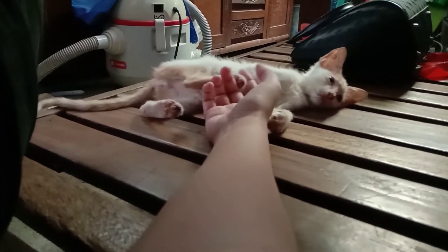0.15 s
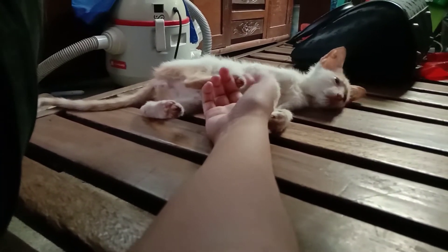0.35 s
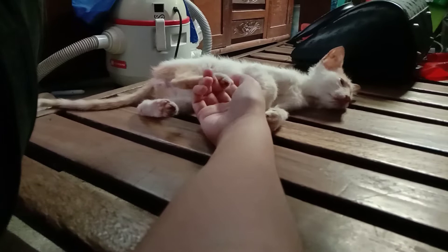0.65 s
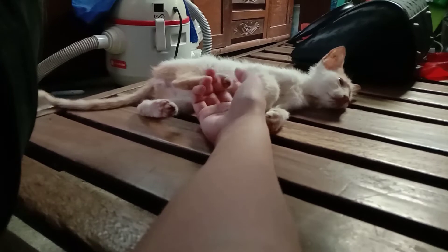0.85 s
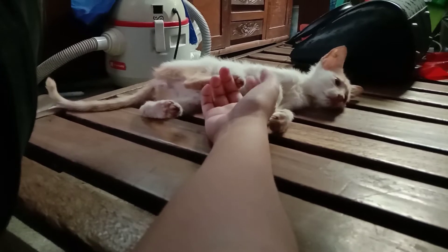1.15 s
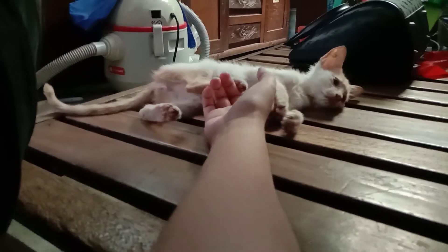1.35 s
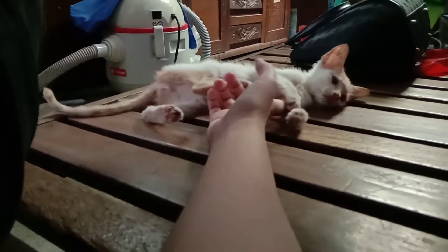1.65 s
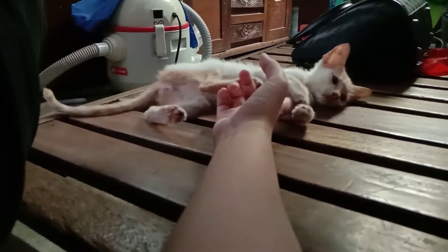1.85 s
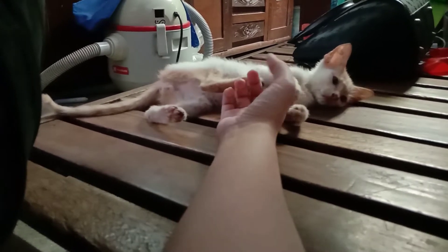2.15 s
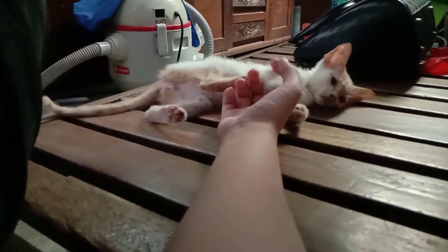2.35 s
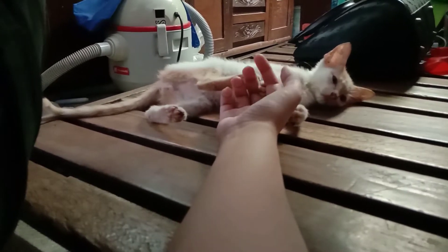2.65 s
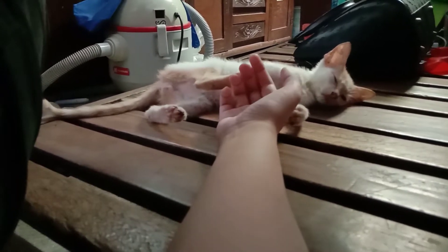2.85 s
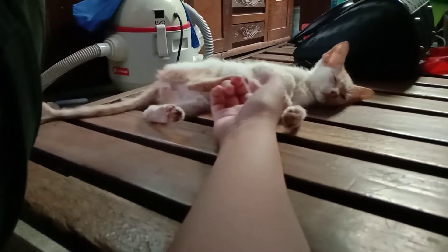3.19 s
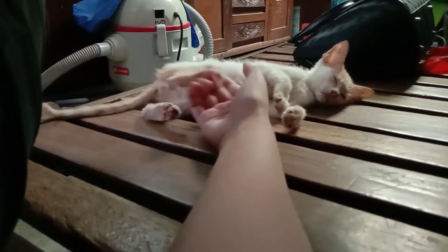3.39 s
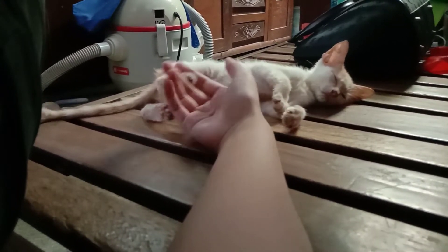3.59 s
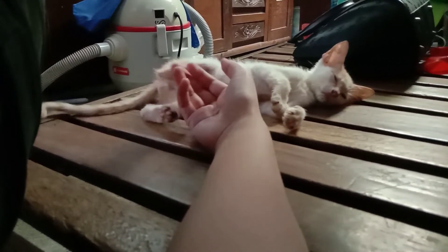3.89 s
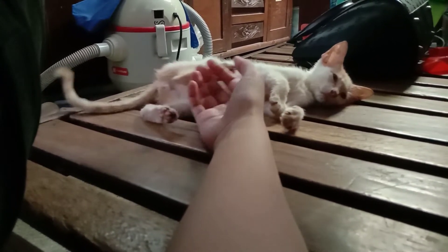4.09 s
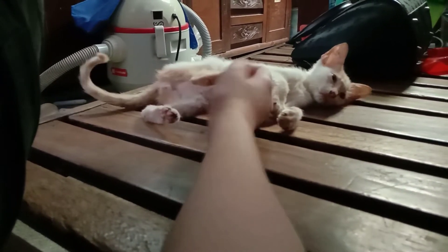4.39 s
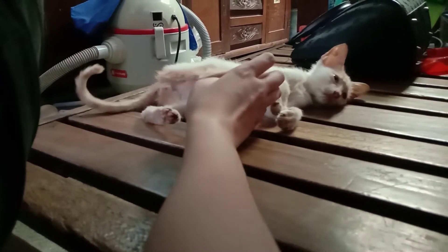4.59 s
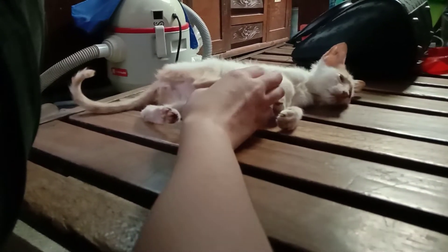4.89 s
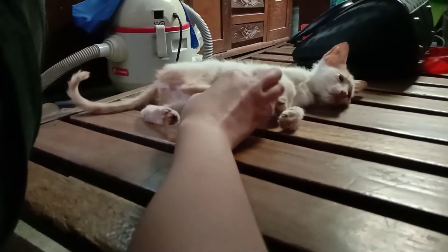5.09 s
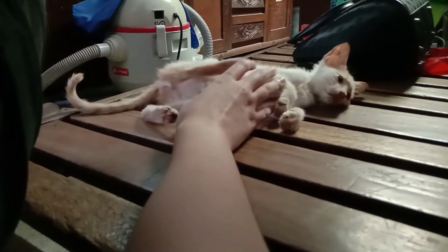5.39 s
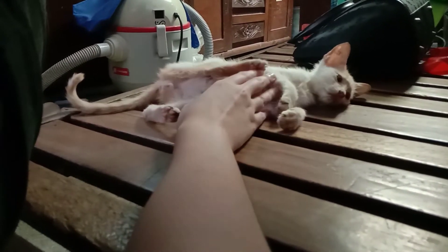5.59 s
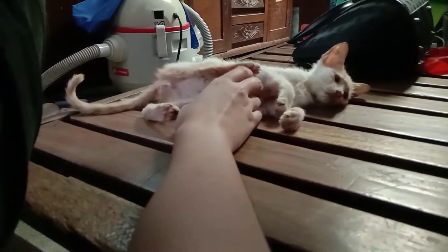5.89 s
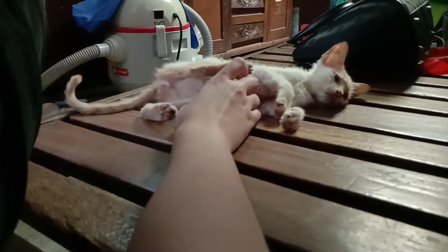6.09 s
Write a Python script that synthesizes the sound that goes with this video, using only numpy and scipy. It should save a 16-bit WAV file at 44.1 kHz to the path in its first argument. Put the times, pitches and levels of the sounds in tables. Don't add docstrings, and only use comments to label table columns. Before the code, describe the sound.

Indoors beside an open wall, a low motor hum throbs under soft whirring air and far traffic. Just before two seconds a rooster in the yard pushes out three raspy syllables, then a clearer held note that roughens and drops away. Faint fowl answer from far off. Near the end another crow starts unsteadily and breaks into a squawk, cut off. A phone microphone catches it with light hiss, nearly mono.

```python
import sys
import numpy as np
from scipy import signal
from scipy.fft import rfft, irfft, next_fast_len
from scipy.io import wavfile
from scipy.ndimage import uniform_filter1d, map_coordinates

SR = 44100
rng = np.random.default_rng(int(sys.argv[2]) if len(sys.argv) > 2 else 0)


def inscribe(sig):
    pcm = np.round(np.clip(np.atleast_2d(sig).T, -1, 1) * 32767)
    wavfile.write(sys.argv[1], SR, pcm.astype(np.int16))


def how_loud(loudness_db):
    steps = np.asarray(loudness_db, float) / 20
    return 10 ** steps


N = 275184


def rooster():
    return syllables() + held_note() + rise() + squawk()


# (time [s], effort [dB], hoarseness [0-1], beak opening as second over first partial [dB])
SYLLABLES = [(1.78, -33, 0.56, -3.5), (1.816, -33.5, 0.76, -2.5), (1.846, -31, 0.71, 7.5),
             (1.96, -33, 0.92, 1.5), (2.055, -44, 1.03, 3.5), (2.1, -33, 0.73, 6.5),
             (2.18, -32.5, 0.79, -6.5), (2.26, -42.5, 1.02, -6), (2.312, -32, .8, -1.5),
             (2.36, -35.5, 0.73, 14), (2.42, -34, 0.53, -0.5), (2.534, -34, 0.59, -4),
             (2.62, -33, 0.65, -2.5), (2.665, -33, 0.84, -7), (2.702, -36.5, 0.93, -4),
             (2.86, -45, 0.56, -7)]
# (time [s], pitch [Hz])
SYLLABLE_PITCH = [(1.78, 640), (1.805, 700), (1.83, 875), (1.9, 905), (2.0, 900), (2.1, 953), (2.3, 947),
                  (2.68, 903), (2.85, 870)]
# (multiple of pitch, level over the upper level [dB], start [s], end [s])
SYLLABLE_TOP = [(3, 0, 2.08, 2.22), (3, 4, 2.38, 2.7), (4, -0.5, 1.8, 2.75), (5, -12, 1.91, 2.0),
                (5, -9, 2.08, 2.25), (5, -7, 2.29, 2.68), (6, -15.5, 2.1, 2.25), (6, -14, 2.3, 2.66),
                (7.15, -14, 1.87, 1.98), (8, -19, 1.835, 1.98), (8, -20, 2.48, 2.72), (9, -17.5, 2.31, 2.6),
                (1.8, 12.5, 2.26, 2.4)]
# (frequency [Hz], density [dB per Hz])
RASP = [(380, -45.5), (640, -7), (879, 1), (1030, -12), (1210, 1.5), (1380, -8.5), (1690, 0.5), (2050, -17),
        (2560, -23), (3550, -22.5), (4380, -45.5), (4670, -48.5), (6010, -61.5), (7430, -48.5),
        (8000, -73.5), (10400, -93.5), (17600, -120)]


def syllables():
    return crow(SYLLABLES, SYLLABLE_PITCH, SYLLABLE_TOP, RASP, top_db=-60)


# (time [s], effort [dB], hoarseness [0-1], second over first partial [dB])
HELD = [
    (2.86, -43.5, 0.93, -4),
    (2.93, -30, 0.52, -8),
    (3.022, -32, .08, -3.5),
    (3.14, -30, .03, -16),
    (3.17, -30, .03, 7.5),
    (3.226, -40.5, 0.46, 19),
    (3.285, -33, 0.37, 12.5),
    (3.33, -35.5, 0.73, -9),
    (3.55, -67, 0.5, 13),
]
# (time [s], pitch [Hz])
HELD_PITCH = [(2.88, 845), (2.95, 850), (3.11, 843), (3.28, 829), (3.33, 815), (3.55, 808)]
# (multiple of pitch, level over the upper level [dB], start [s], end [s])
HELD_TOP = [(1.5, 13, 2.9, 3.42), (2.5, -4.5, 2.92, 3.33), (3, 1.5, 2.89, 3.45), (4, 4, 2.88, 3.48),
            (4.5, -24, 2.92, 3.17), (5, -25, 2.9, 3.25), (7, -24, 3.12, 3.34), (8, -24, 3.04, 3.2),
            (8, -14.5, 3.2, 3.4), (8.5, -25, 3.1, 3.3), (9, -28, 3.05, 3.38)]


def held_note():
    return crow(HELD, HELD_PITCH, HELD_TOP, RASP, top_db=-61.0)


# (time [s], effort [dB], hoarseness [0-1], second over first partial [dB])
RISE = [
    (5.74, -56, .87, -32),
    (5.77, -49, 0.65, 5),
    (5.81, -39.5, 0.74, -1),
    (5.846, -35.5, 0.68, -16),
    (5.91, -36.5, 0.93, -10.5),
    (5.98, -55, 1, -17),
]
# (time [s], pitch [Hz])
RISE_PITCH = [(5.74, 1300), (5.9, 1340)]
# (multiple of pitch, level over the upper level [dB], start [s], end [s])
RISE_TOP = [(3, -11, 5.78, 6.1), (3.5, -10.5, 5.72, 5.88), (5, 7, 5.79, 5.95), (3.9, -10, 5.72, 6.02),
            (4.25, 6, 5.86, 6.9), (.56, 27, 5.86, 5.97)]
# (frequency [Hz], density [dB per Hz])
LATE_RASP = [(320, -49), (550, -31), (736, 4), (911, -8.5), (1010, -7.5), (1270, 4), (1460, -7.5),
             (1800, -1.5), (2040, -21), (2310, -30), (2890, -41), (3530, -41), (4520, -71), (5720, -31),
             (8000, -58), (10400, -77), (17600, -120)]


def rise():
    return crow(RISE, RISE_PITCH, RISE_TOP, LATE_RASP, top_db=-62.5, second=1.36, shaky=0.55)


# (time [s], effort [dB], hoarseness [0-1], second over first partial [dB])
SQUAWK = [
    (5.96, -41.5, .91, -25),
    (5.978, -36, 0.5, -42),
    (6.01, -36, .8, -19.5),
    (6.068, -43, 0.92, 1),
    (6.166, -37, 0.66, -26.5),
    (6.22, -34, 0.77, -17.5),
    (6.24, -35.5, .85, -18),
]
# (time [s], pitch [Hz])
SQUAWK_PITCH = [(5.98, 1100), (6.06, 1145), (6.15, 1135), (6.24, 1145)]
# (multiple of pitch, level over the upper level [dB], start [s], end [s])
SQUAWK_TOP = [(0.778, 16, 5.99, 6.3), (1.58, 15, 5.98, 6.3), (3, -4, 5.96, 6.13), (3, 6, 6.15, 6.3),
              (4.8, -6.5, 5.97, 6.3), (5, -6.5, 5.95, 6.3), (5.15, -5, 5.95, 6.3), (6.4, -9, 6.02, 6.3),
              (6.05, -9, 6.02, 6.14), (2.35, -13, 6.0, 6.2), (2.02, -2, 6.04, 6.3)]


def squawk():
    return crow(SQUAWK, SQUAWK_PITCH, SQUAWK_TOP, LATE_RASP, top_db=-56, first=1.12, shaky=0.55)


def crow(rows, pitch, top, colour, top_db, first=1, second=2, shaky=0.08):
    hz, = curves(pitch)
    effort_db, hoarse, beak_db = curves(rows)
    hoarse = np.clip(hoarse, 0, 1)
    turns = np.cumsum(hz) / SR

    chaos = hoarse ** 3
    jitter = shaky + (1.1 - shaky) * chaos
    shake = jitter * (0.9 * wobble(150) + 1.2 * wobble(45))
    tone_loss_db = 14.5 * chaos
    first_db = effort_db - tone_loss_db - 10 * np.log10(1 + how_loud(2 * beak_db))

    top_db = top_db + 1.12 * (effort_db + 35) + 0.37 * beak_db

    tone = partial(first, first_db, 1.8, turns, shake)
    tone = tone + partial(second, first_db + beak_db, 1.8, turns, shake)
    for multiple, db, start, end in top:
        tone = tone + window(start, end, 0.04) * partial(multiple, top_db + db, 4.5, turns, shake)

    rasp_db = effort_db - 32 * (1 - hoarse)
    voice = tone + how_loud(rasp_db) * rasp(turns, colour)
    return window(rows[0][0], rows[-1][0] + 0.025, 0.038) * voice


def partial(multiple, db, flutter_db, turns, shake):
    level = how_loud(db + 2.0 + flutter_db * wobble(32))
    phase = 2 * np.pi * (multiple * turns + rng.random()) + multiple ** 0.6 * shake
    return level * np.sin(phase)


def rasp(turns, colour):
    uneven_turns = turns / 2 + 0.05 * wobble(120) + 0.25 * wobble(30)
    slaps = np.diff(np.floor(np.maximum.accumulate(uneven_turns)), prepend=0)
    slaps = unit(coloured(slaps * rng.uniform(0.077, 6.3, N), colour))
    air = unit(coloured(rng.standard_normal(N), colour))
    return unit(0.7 * slaps + 0.7 * air) * how_loud(1.5 * wobble(60))


# (frequency [Hz], decay time t60 [s])
YARD = [(500, 0.4), (2000, 0.47), (8000, 0.39)]


def yard(x):
    hz, t, z = signal.stft(rng.standard_normal(SR // 2), SR, nperseg=256)
    decay = how_loud(-60 * t / along(YARD, hz)[:, None])
    tail = signal.istft(z * decay, SR, nperseg=256)[1]
    return signal.fftconvolve(x, tail / np.linalg.norm(tail))[:N]


# (time [s], length [s], pitch [Hz], level [dB])
PEEPS = [(.0, 0.14, 500, -56.5), (0.098, 0.12, 577, -61.5), (0.302, 0.19, 578, -61.5),
         (1.034, 0.077, 1565, -63), (1.295, 0.086, 1576, -62.5), (2.16, 0.097, 482, -52),
         (2.494, 0.37, 304, -53), (3.198, 0.13, 319, -47), (3.381, 0.14, 297, -48),
         (3.592, 0.13, 340.7, -47), (3.659, 0.082, 462, -56), (3.723, 0.074, 566, -52),
         (3.796, .12, 354, -47.5), (3.93, 0.059, 815, -50.5), (4.775, 0.17, 611, -60),
         (5.43, 0.19, 1648, -55), (5.829, 0.29, 245, -54), (3.93, 0.12, 250, -51),
         (2.746, 0.23, 310, -57.5)]


def fowl():
    out = np.zeros(N + SR)
    for s, length, hz, db in PEEPS:
        t = np.arange(int(length * SR)) / SR
        swell = np.sin(np.pi * t / length)
        peep = np.sin(2 * np.pi * hz * t * (1 - 0.022 * t))
        out[round(s * SR):][:len(t)] += how_loud(db + 2.5) * swell * peep
    return out[:N] * how_loud(4.5 * wobble(60))


# (time [s], level [dB])
MOTOR = [(0, -35.5), (.8, -38.5), (.96, -42), (1.2, -40.5), (1.56, -35), (1.9, -39.5), (2.07, -41),
         (2.2, -36.5), (2.6, -35), (2.95, -35), (3.2, -34.5), (3.55, -44.5), (3.7, -38.5), (4.3, -47.5),
         (4.7, -38), (5.4, -47.5), (5.75, -38), (6.24, -46)]
# (frequency [Hz], density [dB per Hz])
HUM = [(15, -58.5), (25, -33), (113, 4), (131, -2), (157, -15.5), (200, -18.5), (260, -45), (440, -120)]


def motor():
    hum_db, = curves(MOTOR)
    t = np.arange(N) / SR
    throb_db = 3.5 * np.sin(2 * np.pi * 6.4 * t + 3.06 * wobble(2.967))
    return how_loud(hum_db + 0.94) * unit(how_loud(throb_db) * rush(HUM, patchy_db=1.07))


# (time [s], level [dB])
AIR = [(0, -53.5), (1.5, -56.5), (1.9, -54.5), (2.9, -48), (4.1, -53.5), (4.6, -52), (6.24, -51)]
# (frequency [Hz], density [dB per Hz])
WHIR = [(410, -55), (700, -13.5), (1080, -8), (1270, 2.5), (1390, -10.5), (1610, -15), (1660, -19),
        (1980, -25), (2150, -31), (2620, -32.5), (4350, -44), (5570, -38.5), (7500, -55.5), (9750, -80),
        (16500, -120)]


def whir():
    whir_db, = curves(AIR)
    return how_loud(whir_db + 1.5) * rush(WHIR, patchy_db=3.5)


# (time [s], half length [s], swell [dB])
PASSES = [
    (0.197, 0.35, 4),
    (2.697, 0.41, 2.5),
    (3.599, 0.63, 6.5),
    (3.76, 0.15, 5.5),
    (4.506, 0.38, 3),
    (5.3, 0.34, 4),
]
# (frequency [Hz], density [dB per Hz])
TRAFFIC = [(88, -29), (150, 0.5), (215, -5), (317, -4.5), (404, -8), (600, -13.5), (682, -19), (900, -25.5),
           (1170, -48), (1980, -120)]


def traffic():
    t = np.arange(N) / SR
    level_db = -56.5 + 1.1 * wobble(6)
    for s, half_s, db in PASSES:
        level_db = level_db + db * np.exp(-((t - s) / half_s) ** 2)
    return how_loud(level_db + 1.83) * rush(TRAFFIC, patchy_db=3.0)


# (frequency [Hz], level [dB])
APART = [(25, -15), (120, -26), (250, -28), (600, -18), (1200, -19), (2200, -13), (2600, -89.5)]


def flicker(x):
    hz, _, z = signal.stft(np.roll(x, 700), SR, nperseg=2048)
    band = np.maximum(hz - 170, 0).astype(int) // 110
    loud = uniform_filter1d(np.abs(z[28:95]).mean(0), size=5)
    quiet = loud < 1.8 * np.median(loud)
    share = np.where(hz[:, None] < 280, 0.15, 0.14 * quiet + 0.02)
    cells = rng.random((band.max() + 1, z.shape[1]))[band] < share
    return coloured(signal.istft(z * cells, SR, nperseg=2048)[1][:N], APART)


# (frequency [Hz], density [dB per Hz])
HISS = [(1500, -120), (2500, 16.5), (8000, 1.5), (13800, -2.5), (14800, 3.5), (15500, 1)]
# (frequency [Hz], density [dB per Hz])
OWN_HISS = [(700, -39.5), (1600, -1.5), (2500, 9.5), (5000, 4.5), (8000, 0), (15500, -0.5)]


def hiss():
    shared = how_loud(-80.0) * unit(coloured(rng.standard_normal(N), HISS))
    own = how_loud(-77.5) * unit(coloured(rng.standard_normal((2, N)), OWN_HISS))
    return shared + own


def unit(x):
    return x / np.sqrt(np.mean(x ** 2) + 1e-20)


def along(points, hz):
    f, v = np.transpose(points)
    return np.interp(np.log(hz + 1), np.log(f + 1), v)


def curves(rows):
    s, *cols = np.transpose(rows)
    return [np.interp(np.arange(N) / SR, s, c) for c in cols]


def window(start, end, fade):
    t = np.arange(N) / SR
    return np.clip(np.minimum(t - start, end - t) / fade, 0, 1)


def wobble(rate):
    at = np.arange(0, N + 32, 32)
    knots = rng.standard_normal(int(N * rate / SR) + 4)
    return np.interp(np.arange(N), at, map_coordinates(knots, [at * rate / SR]))


def coloured(x, spectrum):
    m = next_fast_len(N + 8192)
    gain = how_loud(along(spectrum, np.fft.rfftfreq(m, 1 / SR)))
    return irfft(rfft(x, m) * gain, m)[..., :N]


def rush(spectrum, patchy_db):
    z = signal.stft(rng.standard_normal(N), nperseg=1024)[2]
    field = uniform_filter1d(rng.standard_normal(z.shape), 4, 0)
    field = uniform_filter1d(field, 8, 1)
    patches = how_loud(patchy_db * unit(field))
    noise = signal.istft(z * patches, nperseg=1024)[1][:N]
    return unit(coloured(noise, spectrum))


def scene():
    voice = rooster()
    mid = how_loud(-2.5) * voice + how_loud(-6) * yard(voice) + fowl()
    mid = mid + motor() + traffic() + whir()
    return np.array([mid, mid])


def roll_off(x):
    return signal.sosfilt(signal.butter(12, 16850, fs=SR, output="sos"), x)


def record(dry):
    side = np.array([[1], [-1]]) * flicker(dry[0])
    wet = dry + hiss() + side
    mix = coloured(wet, [(15480, 0), (15540, -80)])
    return roll_off(mix)


dry = scene()
out = record(dry)
inscribe(out)
```